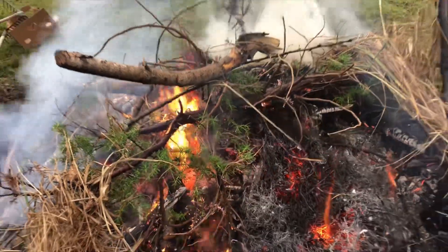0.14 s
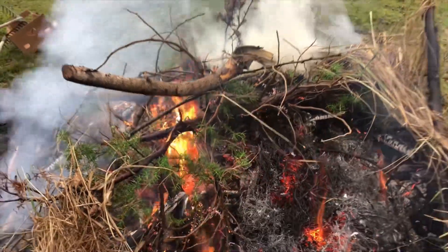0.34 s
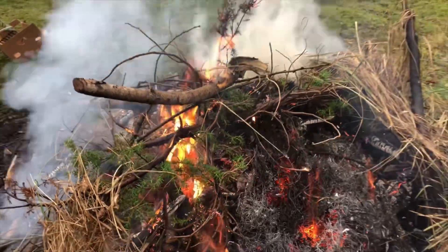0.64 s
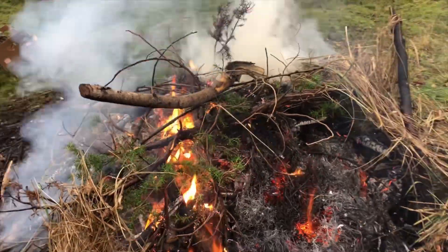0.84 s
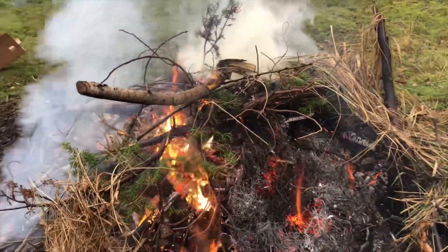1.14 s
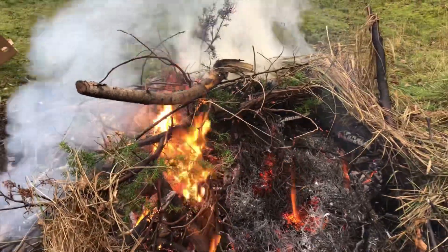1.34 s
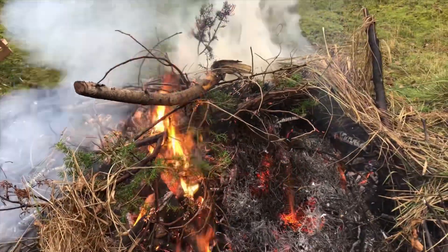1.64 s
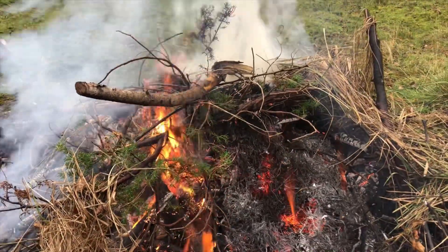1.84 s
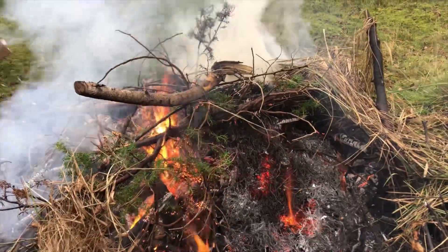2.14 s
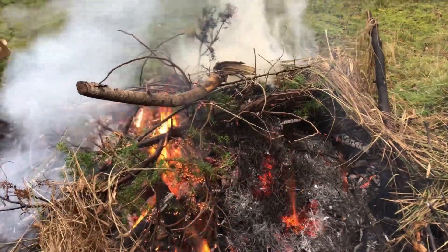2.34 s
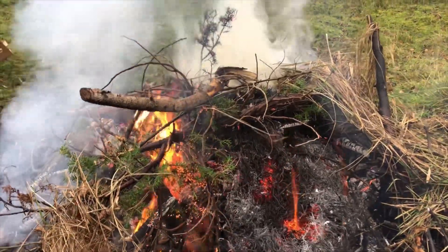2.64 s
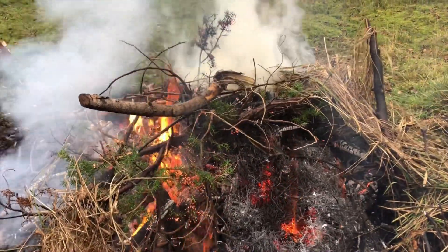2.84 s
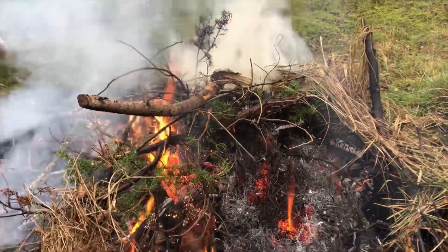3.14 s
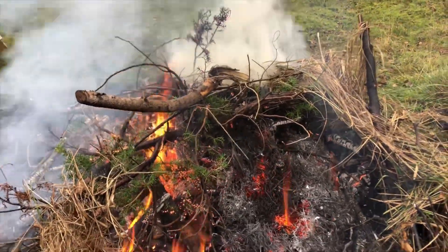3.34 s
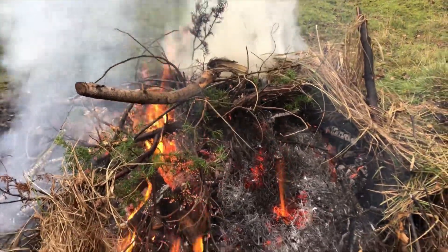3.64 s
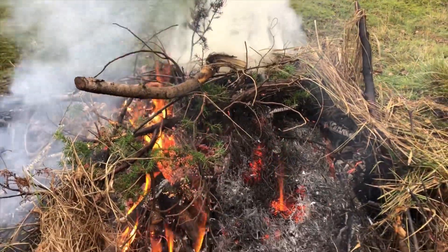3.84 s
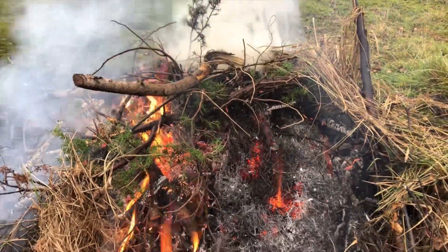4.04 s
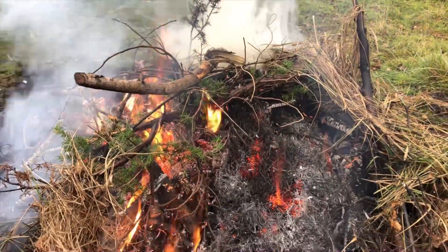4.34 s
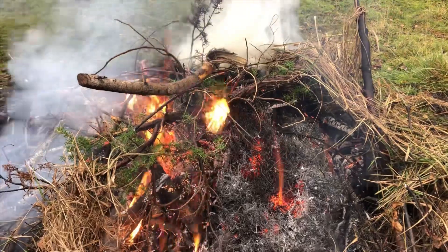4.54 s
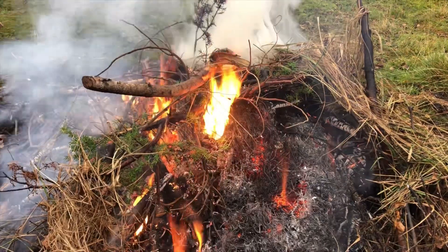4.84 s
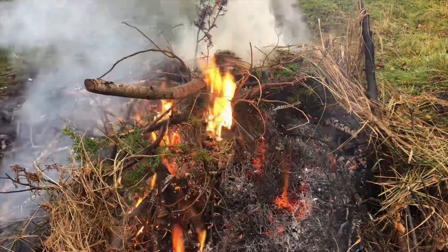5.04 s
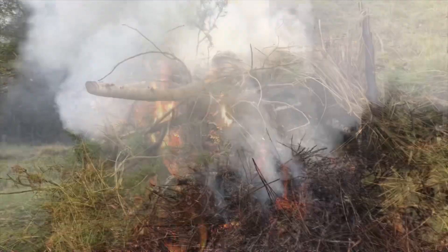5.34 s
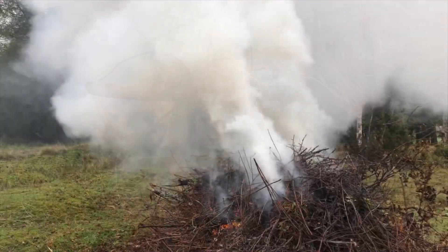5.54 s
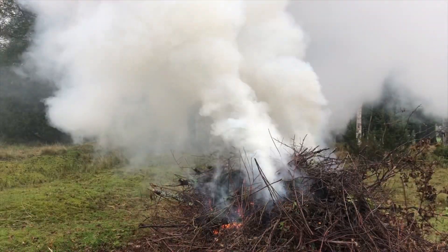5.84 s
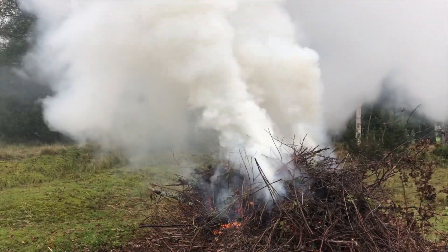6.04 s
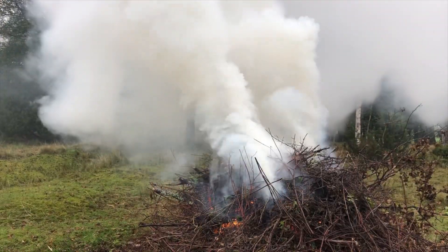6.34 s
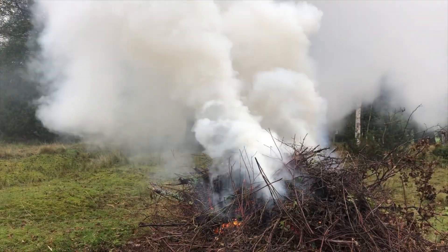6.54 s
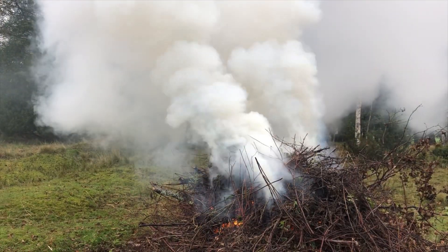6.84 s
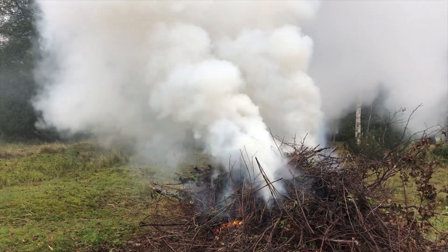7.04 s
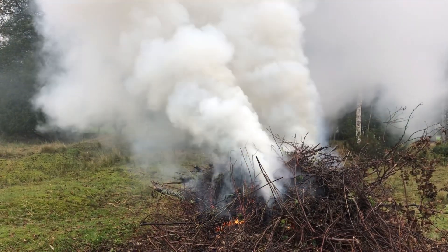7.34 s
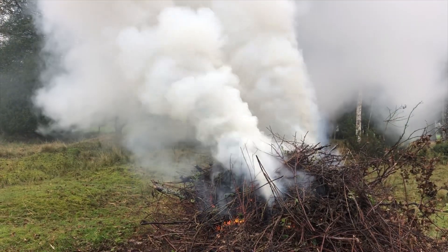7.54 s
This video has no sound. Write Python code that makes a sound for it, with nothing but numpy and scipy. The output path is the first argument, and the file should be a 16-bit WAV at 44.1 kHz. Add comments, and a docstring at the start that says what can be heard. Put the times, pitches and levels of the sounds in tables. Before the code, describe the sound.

A heap of green branches burns outdoors, crackling densely with sharp sap pops, fine needle snaps and faint hissing, then thinning to scattered pops.

```python
"""A heap of green branches burns in a field. Pockets of sap and steam burst in sharp pops that rattle
through the twigs, over a fine crackle of needles, hissing steam and the low flutter of the flames.
Two flare-ups thicken the crackle; after 5.3 s the heap smoulders farther off, with scattered pops."""
import sys
import numpy as np
from scipy.fft import rfft, irfft, next_fast_len
from scipy.io import wavfile
from scipy.ndimage import map_coordinates

SR = 44100
rng = np.random.default_rng(int(sys.argv[2]) if len(sys.argv) > 2 else 0)


def to_wav(sig):
    """Store sig (one row per channel, or 1-D mono) as 16-bit WAV at the path in sys.argv[1].

    Samples outside -1..1 are clipped; the rate is SR.
    """
    pcm = np.clip(np.atleast_2d(sig), -1, 1) * 32767
    pcm = np.round(pcm).astype(np.int16)
    wavfile.write(sys.argv[1], SR, pcm.T)  # frames by channels


N = 339570

# the pops that stand out: (s, strength dB at 4 kHz, woody body dB and bright edge dB relative to it, scattered share dB)
POPS = [(0.0165, -2, -1, 11, -2), (0.0246, -2, 0, 4, -8), (0.0326, 0, -4, 6, -2), (0.0778, -4, 1, -1, -2),
        (0.0834, -4, 1, 6, -8), (0.1241, -4, -2, -1, -3), (0.1541, -4, -2, 4, 2), (0.1734, 6, -5, 2, -3),
        (0.1797, -2, -9, 8, -14), (0.1956, 1, -7, 5, -15), (0.2148, 4, -2, -1, -1), (0.2255, -2, -5, 3, -2),
        (0.2511, -2, -2, 4, 1), (0.2739, -4, -3, 4, -5), (0.2795, -1, -6, -1, 0), (0.3118, 3, -7, 0, -4),
        (0.3703, -7, 0, 8, -6), (0.3796, -3, -5, 4, -1), (0.3972, -2, -6, 5, -9), (0.4238, -2, -6, 2, -3),
        (0.435, -9, -5, 9, -4), (0.4547, 2, -4, 4, -1), (0.4643, -3, 1, 4, -1), (0.5239, -6, -5, 6, -3),
        (0.5382, -2, -2, 1, -4), (0.547, -1, 2, 7, -5), (0.5525, -2, -3, 3, -4), (0.5618, -7, -6, 6, -1),
        (0.5671, -7, -4, 14, -5), (0.6508, 1, 0, 4, -2), (0.6786, -7, -1, 6, 3), (0.69, 0, -6, -1, -9),
        (0.7045, -2, -5, 4, -16), (0.7392, -2, -7, 6, -6), (0.7464, -1, -5, 5, 2), (0.7578, -6, 3, 3, -4),
        (0.7641, 1, -2, 2, -6), (0.7823, -2, -2, 6, -1), (0.7914, -8, -4, 6, -1), (0.82, -3, 2, 2, -3),
        (0.8317, 5, -4, 3, -6), (0.9091, -1, 0, -1, -4), (0.9198, 0, -2, 4, -7), (0.9341, 5, -5, 3, 1),
        (0.9527, -5, -2, 1, -9), (0.9994, 6, -3, -2, -11), (1.0319, -2, -3, 7, -5), (1.0383, 3, -2, -5, -8),
        (1.0654, 1, -3, 4, -9), (1.1146, 1, -6, 3, -12), (1.169, -1, -5, 6, -7), (1.2039, 6, -5, -6, -6),
        (1.2128, -4, -2, 3, -2), (1.2187, -3, -4, 11, -12), (1.2405, 0, -5, 8, -16), (1.2497, -2, -7, 10, 0),
        (1.2638, 4, -3, 1, -13), (1.2773, 8, -6, -1, -4), (1.2816, 1, -5, 2, 1), (1.3078, 2, -3, 2, 0),
        (1.3196, 3, -6, 2, -12), (1.3328, 0, 0, 5, 4), (1.3364, -3, 1, 9, 0), (1.355, -1, -2, 8, -11),
        (1.3669, -1, -2, 8, -5), (1.3943, -1, 0, 13, 1), (1.4091, -1, -3, 6, -6), (1.4139, -5, 1, 5, -8),
        (1.4398, -3, -2, 3, -5), (1.4595, -4, 0, 9, -2), (1.4696, 4, -3, 3, -5), (1.4765, 2, -7, 7, -3),
        (1.4813, -4, -6, 9, -11), (1.499, 1, -3, 5, -12), (1.5197, -4, -2, 2, -6), (1.5581, 6, -7, -3, -7),
        (1.5729, -5, -6, 11, -17), (1.5994, -6, 4, 9, -1), (1.6175, 7, -5, 0, -1), (1.6336, 2, -6, 2, -9),
        (1.6397, -1, 0, 9, -1), (1.6511, -4, 1, 4, -3), (1.6741, -10, -3, 16, -17), (1.6793, 1, -2, 5, -10),
        (1.7169, 3, -2, 1, -1), (1.726, -3, -5, 6, -2), (1.7463, 2, -1, 4, -4), (1.7529, -3, -4, 10, -7),
        (1.7769, 0, -2, 6, -5), (1.7847, -3, -4, 6, -3), (1.7895, -3, -6, 9, -7), (1.7985, -2, -1, 3, -8),
        (1.8868, 1, -3, -1, -4), (1.9199, 0, -10, 6, -16), (1.9282, 0, -7, 7, -11), (1.9459, 2, -7, -6, -10),
        (1.9738, -2, -11, 7, -16), (1.9954, -2, -7, -3, -9), (2.0137, 0, -6, 6, -8), (2.0189, -10, -7, 13, -14),
        (2.0371, 3, -4, 5, -6), (2.1155, 2, -6, 4, -4), (2.2261, 1, 0, 1, 1), (2.2329, 0, 0, 10, -5),
        (2.2898, -4, -3, 1, -11), (2.3181, 5, -7, 0, -1), (2.3332, 7, -9, -5, -9), (2.3672, -9, -1, 7, -9),
        (2.3898, 6, -4, 1, -2), (2.4256, 1, -5, 5, -12), (2.4878, -5, 0, 9, -12), (2.5092, -7, -1, 7, -8),
        (2.5266, -4, -3, -12, -9), (2.562, 2, -5, -6, -10), (2.5805, -1, -1, 7, -3), (2.5844, -2, -4, 1, -1),
        (2.6328, 3, -3, -2, -14), (2.7059, -2, -8, 0, -9), (2.7615, 5, -6, 1, -2), (2.7857, 1, -4, 1, -3),
        (2.8573, -2, -5, 7, -7), (2.8696, -3, -7, 6, -3), (2.8891, -7, -4, 5, -8), (2.9003, -3, 1, -2, -8),
        (2.9099, 0, -4, 6, -5), (2.9264, 1, -10, 4, -17), (2.9583, -6, -13, 13, -17), (2.9683, -7, 0, 3, 2),
        (3.0171, -10, 0, 5, -2), (3.0322, -8, 0, -2, -10), (3.0828, -4, -5, 3, -10), (3.1015, 0, -7, 5, -13),
        (3.1472, -9, -1, 1, -13), (3.1637, -2, -8, 0, -10), (3.1847, 2, -5, -4, -13), (3.3364, -3, -2, 1, -3),
        (3.3451, -3, -8, 3, -12), (3.3893, -11, 0, 9, -13), (3.3949, 0, -6, -1, -3), (3.4598, -10, 3, 1, -4),
        (3.5002, -6, 2, 3, -9), (3.6229, -9, -5, 13, -14), (3.672, 0, -6, 2, -11), (3.6888, 1, -3, -2, -10),
        (3.7292, -8, -2, 2, -6), (3.7654, 6, -4, -4, -4), (3.7794, -6, -3, 0, -7), (3.834, 3, -6, -5, -15),
        (3.8432, -1, -4, 0, -1), (3.8836, -7, 4, 8, -5), (3.8967, -1, -4, -7, -11), (3.9078, 5, -7, -4, -11),
        (3.9467, 5, -6, -9, -8), (3.9594, 1, -6, 2, 0), (3.9855, 0, -4, -3, -11), (4.0382, 8, -7, 0, -1),
        (4.0601, 2, -8, -2, -10), (4.1148, 4, -5, -2, -5), (4.1235, -5, -4, 4, -5), (4.1486, -1, -3, 3, -1),
        (4.1547, 4, -7, 6, 0), (4.1777, -9, -3, 14, -10), (4.1964, 5, -9, 1, -8), (4.2846, -1, -2, 3, -1),
        (4.2917, -2, -4, 9, -15), (4.2991, -9, -3, 8, -11), (4.3036, -7, -1, 14, -15), (4.3139, 3, -6, 1, -9),
        (4.3373, -10, -2, 7, -16), (4.3707, -3, 1, 6, -13), (4.4094, -1, -11, 7, -17), (4.427, 2, 2, 2, -1),
        (4.4587, -1, -2, 4, -6), (4.4797, 0, -5, -1, -8), (4.4894, -1, -1, 2, -10), (4.5023, 3, -2, -1, -4),
        (4.5139, -10, 4, 10, -8), (4.519, 1, -4, 2, -6), (4.5269, -5, 1, 3, -4), (4.5489, -4, 0, 1, -3),
        (4.5556, 0, -4, 2, -8), (4.5953, -2, 0, 4, -6), (4.6073, -4, -4, 9, -3), (4.627, -4, -1, 2, -8),
        (4.6313, 6, -7, -2, -9), (4.6582, 3, -6, 2, -10), (4.668, -12, 1, 13, -11), (4.6863, -4, 1, 6, -3),
        (4.6911, 3, -7, -1, -9), (4.7273, -2, -3, 7, -8), (4.7481, 4, -3, 1, -10), (4.7529, -1, -3, 2, -2),
        (4.7655, -1, -4, 6, -9), (4.9126, -4, -5, 1, -10), (4.9202, 0, -5, 4, -13), (4.9611, -5, 0, 8, 3),
        (4.9895, 1, -8, 1, -4), (5.0335, 0, -7, 0, -9), (5.0644, 3, -5, 4, 2), (5.0781, -3, -3, 5, -1),
        (5.0829, -2, -4, 6, -9), (5.1112, -2, -3, 4, -6), (5.1629, -6, -4, 3, -12), (5.1715, -9, -1, 7, 3),
        (5.2255, -9, -2, 8, -6), (5.2422, 2, -8, -12, -15), (5.2768, -5, -6, 7, -5), (5.3346, -10, -5, 11, -10),
        (5.3604, -2, -9, 2, -12), (5.4051, -4, -3, 4, -1), (5.4287, 4, -1, -7, -10), (5.5519, 2, -8, -3, -6),
        (5.5805, -12, -3, 4, -15), (5.6124, -9, -3, -2, -5), (5.8413, -10, -8, 6, -5), (5.8598, -11, -5, 4, -7),
        (5.9048, 0, -6, 0, -7), (5.9495, -9, -5, -5, -6), (6.0198, -12, -5, 8, -9), (6.1188, -14, -6, 8, -7),
        (6.1784, -12, -4, 5, -8), (6.2141, 5, -2, -8, -10), (6.289, -11, -6, 7, -4), (6.3863, 7, -3, -15, -9),
        (6.4842, -7, -3, 0, -3), (6.5512, -2, -10, -1, -10), (6.5576, -8, -10, 0, 1), (6.6186, 2, -9, -4, -7),
        (6.6702, -8, -5, -9, -4), (6.809, -10, -7, -5, -4), (6.8262, -9, 2, 0, -4), (6.8955, -8, -7, 3, -5),
        (6.991, -11, -4, -2, -2), (7.0246, -12, -11, 4, -7), (7.0342, -9, -10, -2, -8), (7.0444, -7, -4, -5, -6),
        (7.1786, -11, -14, 15, -7), (7.2599, -3, -9, -1, -13), (7.2666, -5, 2, -13, -11), (7.3513, -10, -4, -6, -5),
        (7.5121, -1, -3, 2, -6), (7.5379, -9, -12, -4, -10), (7.6526, -6, -9, -2, -6), (7.678, -11, 5, -1, -8),
        (7.6941, -13, -1, 4, -2)]  # fixed
# how hard the heap burns: (s, flame flutter dB, flame rush dB, twig snaps dB, needle crackle dB)
BLAZE = [(0.0, -50, -48, -35, -36), (0.65, -52, -49, -38, -42), (1.17, -53, -51, -35, -43),
         (1.28, -48, -43, -25, -32.5), (1.55, -50, -47, -33, -39), (1.77, -52, -48, -28, -39),
         (1.87, -51.5, -51, -39, -46), (2.35, -52, -55, -41, -47), (3.25, -54, -57, -46, -51.5),
         (3.6, -53, -59, -49, -54.5), (4.15, -54.5, -52, -35, -43), (4.38, -53.5, -58.5, -40, -47),
         (4.5, -51, -41.5, -32, -38), (4.75, -54, -48, -32, -39), (4.8, -49.5, -48, -45, -53),
         (5.2, -59, -57, -41, -48), (5.7, -61, -59, -45.5, -52.5), (7.7, -61.5, -59, -47, -51)]
FLUTTER = [(15, -55), (25, -30), (40, -12.5), (70, -0.5), (120, -2), (220, -9), (400, -17.5), (1200, -38)]  # (Hz, dB per Hz)
RUSH = [(80, -8), (250, -1.5), (450, -2), (750, -9.5), (1500, -12.5), (2300, -20.5), (5000, -14.5)]  # (Hz, dB per Hz)
STEAM = [(600, -6), (2000, -4), (3500, -1), (5600, 5), (7500, 0.5), (14800, 3.5), (16000, -11)]  # (Hz, dB per Hz)
TICK = [(100, -17), (400, -2.5), (1200, -1.5), (2400, 2.5), (5000, 7), (9000, 5.5), (15000, 3), (16500, -28)]  # (Hz, dB per Hz)
TOP_HZ = 16500  # fixed
# dull bursts deep in thick wood: (s, dB)
KNOCKS = [(4.83, -34), (4.865, -40), (4.878, -45), (5.431, -44), (6.096, -34), (6.3871, -26.5), (7.268, -35), (7.678, -36)]
WOOD = [(323, -15, 0.0055), (490, 8, 0.0069), (855, -1, 0.014), (1680, -3, 0.006)]  # (Hz, dB, t60 s)
# puffs of flame and air: (s, half length s, centre Hz, dB)
PUFFS = [(1.51, 0.021, 140, -57), (1.845, 0.045, 43.8, -43), (2.077, .04, 900, -57), (4.52, 0.037, 150, -50), (4.832, 0.011, 190, -49), (4.869, 0.007, 150, -46), (4.847, 0.047, 1200, -53)]
MUFFLED = [(150, -22.5), (450, -5), (900, -3), (1500, -3), (2000, -10.5), (3000, -7), (7000, -54)]  # (Hz, dB per Hz)
POP = [(40, -35), (130, -20), (300, -10.5), (600, -4.5), (1500, 0.87), (2400, -2.0), (5000, 0.5), (15200, -0.43), (16500, -11.5)]  # (Hz, dB)
SNAP_RATE, SNAP_TOP_DB, SNAP_AT_DB = 90, -7.5, -38  # snaps a second and the strongest of them, at this level of the fire
SNAP_CROWDING, SNAP_GROWTH = .25, 0.53  # dB of rate and of strength per dB of fire
SNAP_RANGE_DB, SNAP_BODY_DB, SNAP_EDGE_DB, SNAP_SCATTER_DB = 25.5, -1.5, 2.5, -4.5  # spread of sizes; typical colour and scatter
SPLIT_S, SPLIT_DB, SPLIT_SPREAD_DB = .0009, -28, 6  # the bark splits this long before a pop and this much weaker  # fixed
HISS_DB = (-62.5, -56.5)  # steam from the green wood: blazing near by, smouldering far off
PUFF_FLAP_DB, PUFF_FLAPS_PER_S = 4, 220  # the flame tears and flaps within each puff
FAR_S = (5.25, 5.6)  # the heap recedes over this time  # fixed
FAR_DULL_DB = 1.5  # far snaps lose their edge
STIR, STIR_S, STIR_USUAL_S, STIR_LAG_S = .4, .05, .45, .012  # small snaps bunch around the big pops, centred a little after them: how much, how long, against what average, how late


def amp(db):
    """Decibels to gain."""
    return 10 ** (np.asarray(db) / 20)


def unit(x):
    """Scale to rms 1."""
    return x / np.sqrt(np.mean(x ** 2) + 1e-20)


def along(points, hz):
    """Read (Hz, value) points on a log axis."""
    f, v = np.transpose(points)
    return np.interp(np.log(hz + 1), np.log(f), v)


def curves(rows):
    """One value per sample for each column after the time."""
    s, *cols = np.transpose(rows)
    return [np.interp(np.arange(N) / SR, s, c) for c in cols]


def wobble(rate):
    """A smooth random curve, rate knots a second."""
    return map_coordinates(rng.standard_normal(int(N * rate / SR) + 4), [np.arange(N) * rate / SR])


def filtered(x, response):
    """x times a response of frequency."""
    m = next_fast_len(N + SR // 2)
    return irfft(rfft(x, m) * response(np.fft.rfftfreq(m, 1 / SR)), m)[:N]


def noise(spectrum):
    """Coloured noise of rms 1."""
    return unit(filtered(rng.standard_normal(N), lambda hz: amp(along(spectrum, hz))))


def causal(gain_db):
    """Responses with these gains (one row each) that start at once and ring afterwards."""
    cepstrum = irfft(np.log(amp(gain_db)))
    half = cepstrum.shape[1] // 2
    cepstrum[:, 1:half] *= 2
    cepstrum[:, half + 1:] = 0
    return np.exp(rfft(cepstrum))


def bursts(times, colour_db, scatter_db, twig_t60, heap_t60, heap_db):
    """Each burst is one pressure spike, then its scatter off near twigs and, fainter, from the whole heap."""
    size = 2 * (colour_db.shape[1] - 1)
    t = np.arange(size) / SR
    dying = amp(-60 * t / twig_t60) + amp(heap_db - 60 * t / heap_t60)
    paths = rng.standard_normal((len(times), size))
    tail = paths * np.abs(paths) ** 1.32 * dying * (1 - np.exp(-t / 0.00057))  # a few strong echoes among many weak ones
    shot = tail / np.linalg.norm(tail, axis=1, keepdims=True) * amp(scatter_db)[:, None]
    shot[:, 0] = 1
    shot /= np.linalg.norm(shot, axis=1, keepdims=True)
    waves = irfft(rfft(shot) * causal(colour_db)) * rng.choice([-1, 1], (len(times), 1))
    where = np.round(np.abs(times) * SR).astype(int)[:, None] + np.arange(size)
    return np.bincount(where.ravel(), waves.ravel(), N)[:N]


def pops():
    """The big pockets of sap and steam burst one by one, each just after a faint splitting of the bark."""
    s, db, body_db, edge_db, scatter_db = np.transpose(POPS)
    early, strong = np.clip(rng.standard_normal((len(s), 2)), -1.7, 1.7).T
    split = wood_bursts(s - SPLIT_S * np.exp(.5 * early), db + SPLIT_DB + SPLIT_SPREAD_DB * strong, body_db, edge_db, scatter_db + 9, size=1024)
    return split + wood_bursts(s, db, body_db, edge_db, scatter_db)


def crackle(level_db, spectrum, rate, spread_db, tilt_db, scatter_db, size=1024):
    """Tiny snaps by the hundred, each with its own size and brightness; a hotter fire makes more of them."""
    density = rate * amp(.3 * (level_db + 45.0))
    at = np.flatnonzero(rng.random(N) < density / SR)
    strength, tilt, scatter = np.clip(rng.standard_normal((len(at), 3)), -1.7, 1.7).T
    hz = np.fft.rfftfreq(size, 1 / SR)
    lean = along([(1000, -1.5), (14000, .5)], hz)  # fixed
    colour = along(spectrum, hz) + spread_db * strength[:, None] + tilt_db * tilt[:, None] * lean
    ticks = bursts(at / SR, colour, scatter_db + 4 * scatter, twig_t60=.008, heap_t60=.04, heap_db=-30)  # fixed
    return amp(level_db) * unit(ticks / np.sqrt(density))


def flames():
    """Turbulent flames flutter and rush while steam hisses out of the green wood."""
    flutter_db, rush_db, _, _ = curves(BLAZE)
    flutter = amp(flutter_db - 1.5 + 2.0 * wobble(11)) * noise(FLUTTER)
    rush = amp(rush_db - 2 + 2.7 * wobble(23)) * noise(RUSH)
    hiss = amp(np.interp(np.arange(N) / SR, FAR_S, HISS_DB) + 0.85 * wobble(46)) * noise(STEAM)
    return flutter + rush + hiss


def knocks():
    """A burst inside a thick branch sets it ringing briefly."""
    t = np.arange(SR // 16) / SR
    out = np.zeros(N + len(t))
    for s, db in KNOCKS:
        pitch = np.exp(0.063 * rng.standard_normal(len(WOOD)))
        ring = sum(amp(level - 60 * t / t60) * np.sin(2 * np.pi * hz * p * t) for (hz, level, t60), p in zip(WOOD, pitch))
        out[round(s * SR):][:len(t)] += amp(db) * ring * (1 - np.exp(-t / 0.00075))
    return out[:N]


def puffs():
    """Soft, flapping whooshes as the flare-ups swell and collapse."""
    t = np.arange(N) / SR
    out = np.zeros(N)
    for s, width, hz, db in PUFFS:
        air = noise([(hz / 3, -34), (hz * 0.72, -3), (hz, 0), (hz * 1.6, -4), (hz * 12, -60)])  # fixed
        flap = amp(PUFF_FLAP_DB * wobble(min(PUFF_FLAPS_PER_S, hz / 4)))
        out += amp(db) * np.exp(-.5 * ((t - s) / width) ** 2) * unit(air * flap)
    return out


def wood_bursts(s, db, body_db, edge_db, scatter_db, size=2048):
    """Thick wood gives a pop its body, thin bark its bright edge."""
    hz = np.fft.rfftfreq(size, 1 / SR)
    body = along([(1200, 1), (3500, 0)], hz)  # fixed
    edge = along([(4500, 0), (11000, 1), (16000, 1.15)], hz)  # fixed
    colour = along(POP, hz) + db[:, None] + body_db[:, None] * body + edge_db[:, None] * edge
    return bursts(s, colour, scatter_db, twig_t60=.009, heap_t60=.045, heap_db=-26)  # fixed


def snaps(stir_db, count=1100):
    """Smaller pockets burst at random; a hotter fire makes them more frequent and stronger."""
    heat_db = curves(BLAZE)[2] + stir_db - SNAP_AT_DB
    due = np.cumsum(SNAP_RATE * amp(SNAP_CROWDING * heat_db)) / SR
    wait, small, body, edge, scatter = rng.random((count, 5)).T
    at = np.minimum(np.searchsorted(due, np.arange(count) + 2 * wait), N - 1)
    db = np.where(at < N - 1, SNAP_TOP_DB + SNAP_GROWTH * heat_db[at] - SNAP_RANGE_DB * small, -120)
    edge_db = SNAP_EDGE_DB + 11 * (edge - .5) - FAR_DULL_DB * np.interp(at / SR, FAR_S, (0, 1))
    return wood_bursts(at / SR, db, SNAP_BODY_DB + 9 * (body - .5), edge_db, SNAP_SCATTER_DB + 14 * (scatter - .5), size=1024)


def stir():
    """dB by which a run of big pops stirs up the crackle; lulls between them fall quiet."""
    s, db = np.transpose(POPS)[:2]
    train = np.bincount(np.round((s + STIR_LAG_S) * SR).astype(int), amp(db / 2), N)[:N]
    near, usual = (np.abs(filtered(train, lambda hz: np.exp(-(2 * hz * span) ** 2))) for span in (STIR_S, STIR_USUAL_S))
    return STIR * 20 * np.log10((1 + near / (usual + 1e-9)) / 2)


def scene():
    """The whole burning heap: needles crackle brightly on top, twigs deep inside sound muffled and follow the flames."""
    _, rush_db, _, needle_db = curves(BLAZE)
    stir_db = stir()
    heap = pops() + snaps(stir_db) + knocks() + flames() + puffs()
    needles = crackle(needle_db + stir_db - 3, TICK, rate=170, spread_db=7.5, tilt_db=2.5, scatter_db=-5)
    twigs = crackle(rush_db - 3, MUFFLED, rate=320, spread_db=7.0, tilt_db=1.0, scatter_db=-2)
    return (heap + needles + twigs)[None]


def record(dry):
    """The microphone smears each spike a little, its bass arriving last, and keeps nothing above its band limit."""
    lag = [(100, 0.0058), (250, 0.0036), (500, 0.0012), (1500, 0.000092), (5000, 0.000021), (10000, 0.000027), (16500, .00025)]  # (Hz, delay s)
    smeared = filtered(dry[0], lambda hz: np.exp(-2j * np.pi * np.cumsum(along(lag, hz)) * hz[1]))
    return filtered(smeared, lambda hz: 1 / np.sqrt(1 + (hz / TOP_HZ) ** 300))[None]  # fixed


dry = scene()
out = record(dry)
to_wav(out)
```